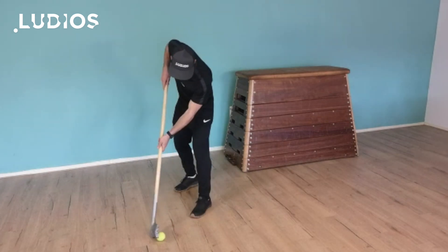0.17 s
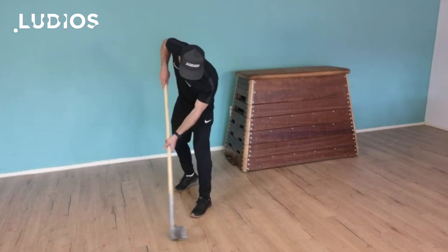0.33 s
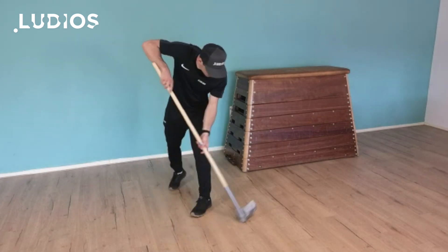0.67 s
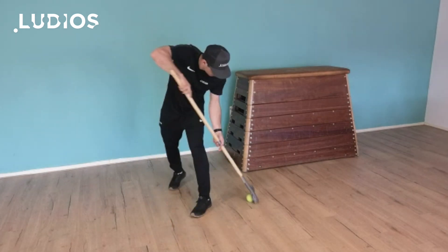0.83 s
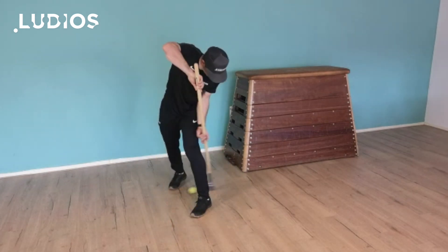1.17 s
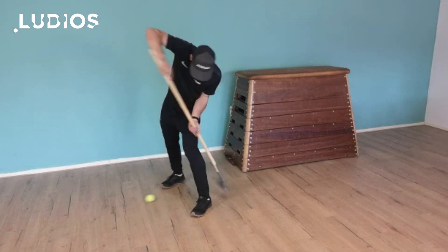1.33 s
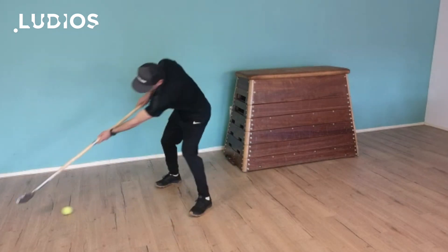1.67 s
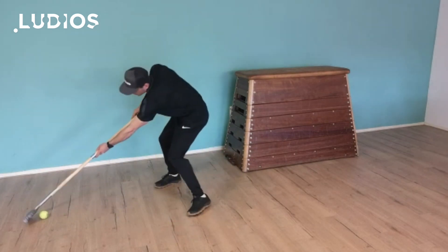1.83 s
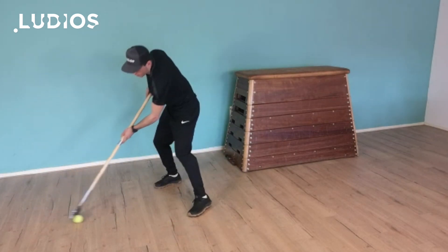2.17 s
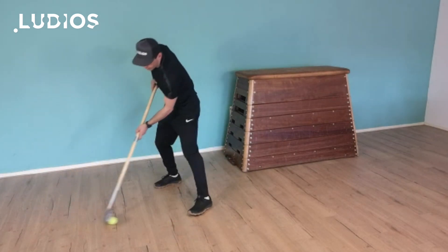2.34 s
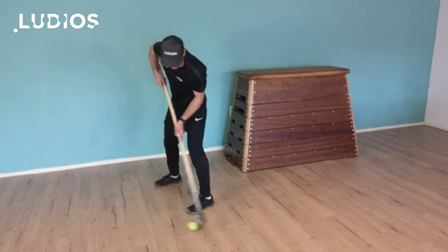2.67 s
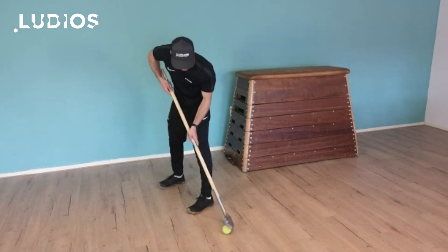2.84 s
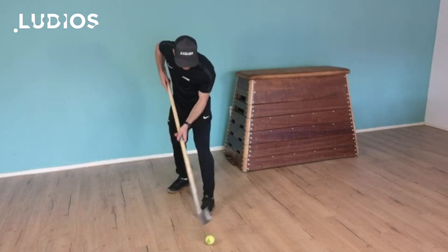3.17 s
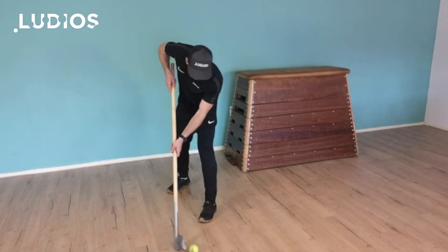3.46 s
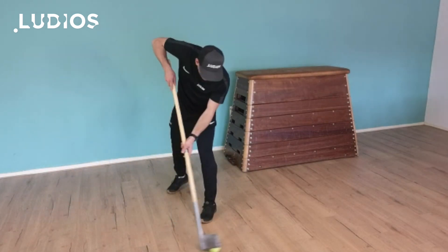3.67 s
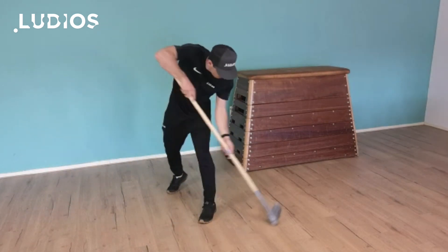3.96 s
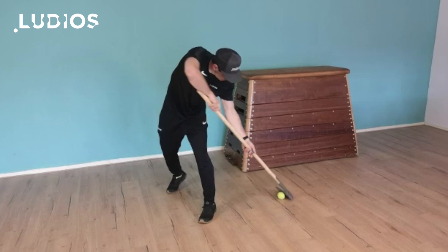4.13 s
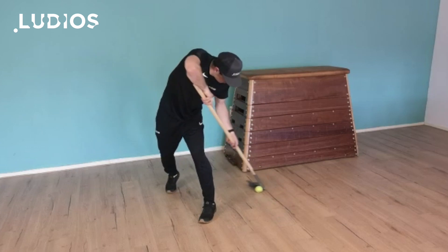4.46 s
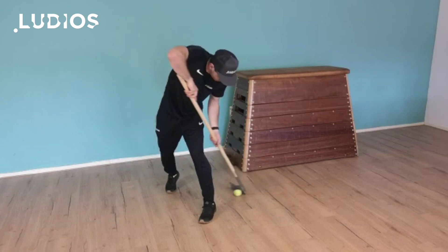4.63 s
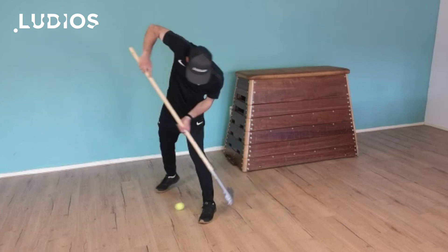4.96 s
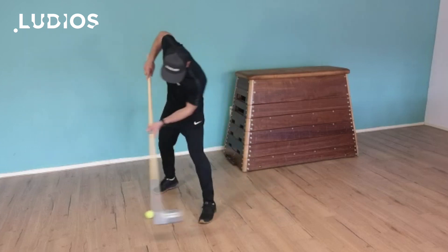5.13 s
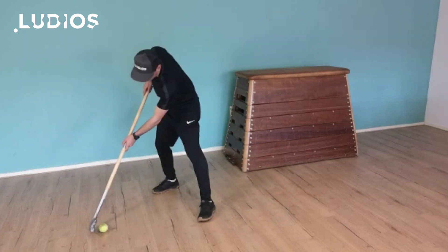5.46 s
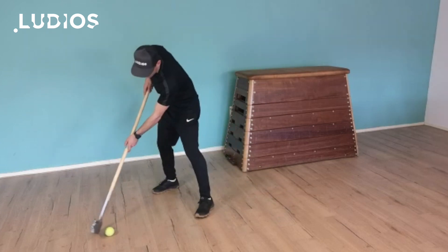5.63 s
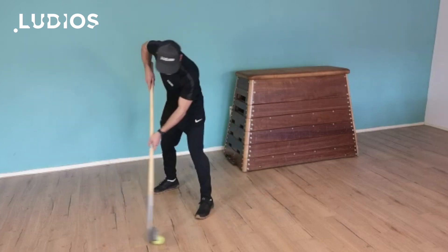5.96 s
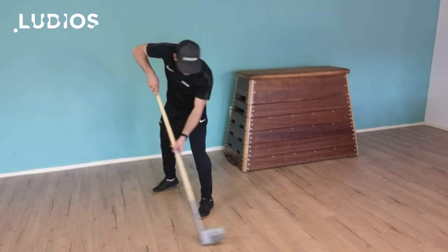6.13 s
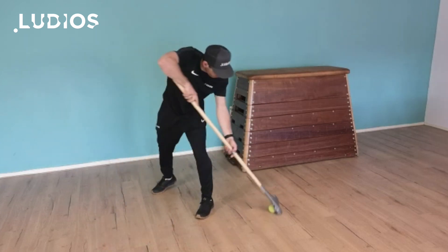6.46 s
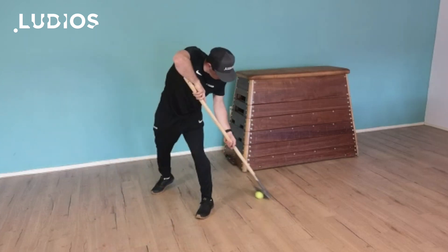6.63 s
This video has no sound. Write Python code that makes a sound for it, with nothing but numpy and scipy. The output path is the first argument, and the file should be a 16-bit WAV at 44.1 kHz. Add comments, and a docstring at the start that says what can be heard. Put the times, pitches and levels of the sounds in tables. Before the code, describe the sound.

A wooden stick dribbles a ball over floorboards in a bare room with a short echo. Gritty, hissing blade scrapes start at once, peaking around 0.5 seconds with a soft floor thump. More strokes and dull ball drags follow from 0.9 to 1.5 seconds, some chattering into rough, gliding squeaks. At 1.8 seconds comes the loudest hit, a quick cluster of clacks and thuds that shakes the boards, followed by squeaky scraping. From 2.3 to 3.7 seconds there are only light taps and faint scuffs. A busy run of scrapes lasts from 3.8 to 4.8 seconds, with a crunchy knock at 4.2 and a hollow, rising ring just after. The ball thuds at 5 and 5.4 seconds, then is dragged softly. A bright scrape with a falling squeak comes at 6.2 seconds, then a small last scuff. Low rumble and faint hiss lie underneath throughout.

```python
"""A bare room with a board floor, where a player dribbles a ball with a wooden stick.
The blade scrapes over grit in strokes and sometimes chatters into a gliding note.
The ball is tapped and dragged, at times with a hollow, rising ring; the blade drops on the floor.
The boards shake under the load and hard walls blur stick and ball.
A low rumble and a faint hiss lie underneath."""
import sys
import numpy as np
from scipy import signal
from scipy.fft import rfft, irfft
from scipy.io import wavfile
from scipy.ndimage import uniform_filter1d, map_coordinates

SR = 44100
rng = np.random.default_rng(int(sys.argv[2]) if len(sys.argv) > 2 else 0)


def wrap_up_sound(samples):
    """Save the sound to the file named by the first command line argument, as 16-bit audio."""
    columns = np.atleast_2d(samples).T
    # keep every value between -1 and 1, then stretch to whole-number steps
    tamed = np.clip(columns, -1, 1)
    steps = np.round(tamed * 32767).astype(np.int16)
    wavfile.write(sys.argv[1], SR, steps)


N = 299785


def from_db(db):
    """Decibels to gain."""
    return 10 ** (np.asarray(db) / 20)


def unit_rms(x):
    """Scale to rms 1."""
    return x / np.sqrt(np.mean(x ** 2) + 1e-20)


def unit_energy(x):
    """Scale a response so that white noise keeps its power through it."""
    return x / np.sqrt(np.sum(x ** 2, axis=-1, keepdims=True) + 1e-20)


def at_hz(points, hz):
    """Read a table on a log-frequency axis."""
    known, values = np.transpose(points)
    return np.interp(np.log(np.maximum(hz, 1)), np.log(known), values)


def wander(steps):
    """Random modulator that glides to a new value each time steps rises by one."""
    return np.interp(steps, np.arange(N), rng.standard_normal(N))


def through(x, response):
    """Pass a sound through an impulse response."""
    return signal.oaconvolve(x, response)[:N]


def body(spectrum, resonances=(), size=8192):
    """Minimum-phase response: a broad EQ curve with narrow resonances on top."""
    hz = np.linspace(0, SR / 2, size // 2 + 1)
    peaks_db = sum(lift / (1 + (2 * (hz - centre) / width) ** 2) for centre, width, lift in resonances)
    cepstrum = irfft(np.log(from_db(at_hz(spectrum, hz) + peaks_db)))
    return unit_energy(irfft(np.exp(rfft(2 * cepstrum[:size // 2], size))))


def pushes(starts, lengths, attacks_s, swells_db, levels_db, arch_db, release_t60_s):
    """Envelope of pushes: each bites, arches with its speed and dies away as the contact lifts."""
    power = np.zeros(N)
    cues = np.broadcast(starts, lengths, attacks_s, swells_db, levels_db)
    for start, length, attack_s, swell_db, level_db in cues:
        first = max(int(start * SR), 0)
        t = np.arange(min(SR, N - first)) / SR
        progress = np.minimum(t / length, 1)
        attack = np.minimum(t / attack_s, 1)
        hold_db = level_db + swell_db * (progress - .5) - arch_db * (2 * progress - 1) ** 2
        release_db = -60 * np.maximum(t - length, 0) / release_t60_s
        power[first:first + len(t)] += (attack * from_db(hold_db + release_db)) ** 2
    return np.sqrt(power)


def friction(slips_per_s, size_db, judder_db, judder_hz, steady_s=0.026):
    """Tiny uneven slips, bunched by the judder of the contact; the hand steadies the mean pressure."""
    slips = (rng.random(N) < slips_per_s / SR) * rng.choice([-1, 1], N)
    sizes = from_db(size_db * np.minimum(rng.exponential(1, N), 4))
    judder = from_db(judder_db * unit_rms(wander(np.arange(N) / SR * judder_hz)))
    mean_pressure = np.sqrt(uniform_filter1d(judder ** 2, int(steady_s * SR)))
    return unit_rms(slips * sizes * judder / mean_pressure)


# Woody resonances of the stick: (frequency [Hz], width [Hz], boost [dB])
STICK_RESONANCES = [(546, 160, 6.5), (863, 38, 1.5), (1496, 25, 2), (1665, 82, 3.5), (2435, 115, 2.5),
                    (2590, 130, 2), (2803, 340, 3), (5550, 560, 2), (7080, 800, 4.5), (7720, 900, 7)]
# Bright EQ of the blade's edge: (frequency [Hz], level [dB])
HISS_EQ = [(100, -32), (500, -26), (1500, -17), (3000, -1), (4000, 2), (5200, 5), (7800, -2), (9200, -1),
           (10500, -10.5), (15000, -18)]
# Midrange EQ of the whole blade: (frequency [Hz], level [dB])
RASP_EQ = [(200, -50), (1000, -3.5), (1500, 2), (2100, 6), (2700, 2), (3300, -3), (5000, -3.5),
           (8000, -16.5), (12000, -37)]
# Blade strokes: (start [s], length [s], attack [s], swell [dB], hiss level [dB], rasp level [dB])
BLADE_STROKES = [(0.0, 0.72, 0.0012, 2, -62.5, -75), (0.151, 0.26, 0.0083, 29.5, -50, -56),
                 (0.41, 0.11, 0.014, -1, -42, -60), (0.488, 0.11, 0.015, 0.5, -36.5, -47.5),
                 (0.864, 0.12, 0.035, 2.5, -46.5, -54.5), (0.97, 0.059, 0.017, 1, -44.5, -50.5),
                 (1.155, 0.069, 0.02, -1.5, -50.5, -49.5), (1.237, 0.26, 0.12, -13.5, -59.5, -48.5),
                 (1.558, 0.24, 0.018, 0, -75, -69), (1.768, 0.12, 0.01, -15.5, -53, -46.5),
                 (1.929, 0.18, 0.0082, 0.5, -48.5, -50), (2.108, 0.079, 0.016, 7.5, -46.5, -50),
                 (2.535, 0.065, 0.029, -3, -55.5, -54), (2.936, 0.036, 0.0069, -1, -65, -52.5),
                 (3.229, 0.019, 0.002, -3, -71, -59.5), (3.455, 0.09, 0.032, 1, -60, -63.5),
                 (3.583, 0.23, 0.027, 7, -65, -68), (3.825, 0.041, 0.004, 1, -41, -49),
                 (3.859, 0.14, 0.038, -24, -38.5, -50.5), (4.093, 0.13, 0.033, 3.5, -40, -51),
                 (4.237, 0.33, 0.034, -11, -54, -50), (4.508, 0.11, 0.015, 7.5, -43, -40.5),
                 (4.626, 0.081, 0.016, 11.5, -43.5, -45.5), (4.738, 0.028, 0.007, -16, -43.5, -49),
                 (4.862, 0.077, 0.043, -25, -66, -60), (5.392, 0.047, 0.024, -3, -49, -67),
                 (5.472, 0.15, 0.024, -18, -67.5, -59.5), (5.621, .16, 0.0051, 9, -55, -58.5),
                 (5.832, 0.27, 0.037, -18, -70.5, -78), (6.18, 0.16, 0.015, -3.5, -38.5, -51),
                 (6.491, 0.055, 0.033, -6, -52.5, -58.5)]


def blade_scrape():
    """The edge hisses over the grit; pressed down, the whole blade rasps."""
    *shape, hiss_db, rasp_db = np.transpose(BLADE_STROKES)
    edge, pressure = (pushes(*shape, db, arch_db=4, release_t60_s=0.04) for db in (hiss_db, rasp_db))
    hiss = edge * friction(slips_per_s=18000, size_db=-1.0, judder_db=3.5, judder_hz=150)
    rasp = pressure * friction(slips_per_s=7000, size_db=2.0, judder_db=6.0, judder_hz=130)
    return through(hiss, body(HISS_EQ, STICK_RESONANCES)) + through(rasp, body(RASP_EQ, STICK_RESONANCES))


# Dull EQ of the rubbing ball: (frequency [Hz], level [dB])
RUB_EQ = [(80, -16.5), (250, -6), (400, -5), (550, -7), (900, -1), (1400, -3), (2500, -9), (8000, -44)]
# Drags of the ball: (start [s], length [s], swell [dB], level [dB])
BALL_DRAGS = [(0.0, 0.34, -9, -78), (0.358, 0.22, 10, -62), (0.94, 0.072, 25.5, -65),
              (1.148, 0.049, 6, -52), (1.298, 0.23, -10, -60.5), (1.833, 0.072, -1, -58.5),
              (1.945, 0.11, -12, -64), (2.149, 0.035, -7, -61.5), (2.946, 0.13, -16, -68.5),
              (4.132, 0.36, -5.5, -53), (4.536, 0.19, -7.5, -53), (4.866, 0.12, -22, -74),
              (5.389, 0.077, -4, -52), (5.481, 0.34, -6, -69)]


def ball_drag(attack_s=0.0058):
    """The ball rubs between blade and boards with a duller grain."""
    starts, lengths, swells_db, levels_db = np.transpose(BALL_DRAGS)
    envelope = pushes(starts, lengths, attack_s, swells_db, levels_db, arch_db=2.0, release_t60_s=0.14)
    grain = friction(slips_per_s=3100, size_db=2.5, judder_db=3.5, judder_hz=100)
    return through(envelope * grain, body(RUB_EQ, STICK_RESONANCES))


# Low end of the room tone: (frequency [Hz], level [dB])
RUMBLE_EQ = [(20, 2), (45, 0.5), (62, -13.5), (85, -9.5), (120, -16.5), (200, -26), (320, -34.5),
             (600, -73)]
# Airy top of the room tone: (frequency [Hz], level [dB])
AIR_EQ = [(400, -2.5), (800, -7), (2000, 0.5), (3300, -6.5), (5500, -8.5), (7800, -9), (10500, -18.5),
          (15000, -20.5)]


def room_tone(rumble_db=-51, air_db=-71, side_db=-30):
    """A steady bed of near-mono rumble and faint, wide hiss."""
    mid, side = (through(rng.standard_normal(N), body(RUMBLE_EQ)) for _ in range(2))
    rumble = mid + from_db(side_db) * side * [[1], [-1]]
    air = np.array([through(rng.standard_normal(N), body(AIR_EQ)) for _ in range(2)])
    return from_db(rumble_db) * rumble + from_db(air_db) * air


# Rough gliding notes, the blade's chatter and the dragged ball's hollow, rising ring:
# (start [s], length [s], level [dB], first pitch [Hz], last pitch [Hz], held in step [cycles])
GLIDING_NOTES = [(0.233, 0.22, -54.5, 3260, 3708, 2.78), (0.994, 0.045, -45.5, 5770, 5500, 3.1),
                 (1.319, 0.16, -53, 2164, 1759, 2.6), (1.931, 0.18, -54, 2928, 2558, 3.85),
                 (2.11, 0.075, -47, 2702, 3356, 3), (2.555, 0.0442, -61, 2300, 2050, 4.8),
                 (2.947, 0.035, -58.5, 2498, 2250, 3.5), (3.224, .03, -65, 2630, 2590, 3),
                 (3.83, 0.027, -47, 2753, 2800, 3.1), (3.882, 0.064, -43, 3650, 3200, 2.3),
                 (4.33, 0.18, -52.5, 955.4, 1250, 1.6), (4.523, 0.0393, -47.5, 2257, 2050, 4.5),
                 (4.575, 0.141, -46.5, 1557, 1590, 3.1), (5.629, 0.16, -65.5, 2540, 2896, 5.1),
                 (6.19, 0.12, -40.5, 3013, 2447, 4), (6.509, 0.035, -58.5, 2600, 2560, 6)]


def chatter_and_ring(attack_s=0.0077, swell_db=-9.5):
    """Slips lock loosely to a gliding resonance; the sooner they lose step, the rougher the note."""
    starts, lengths, levels_db, first_hz, last_hz, cycles_held = np.transpose(GLIDING_NOTES)
    t = np.arange(N) / SR
    note = np.maximum(np.searchsorted(starts, t) - 1, 0)
    glide = np.clip((t - starts[note]) / lengths[note], 0, 1)
    hz = first_hz[note] + (last_hz - first_hz)[note] * glide
    envelope = pushes(starts, lengths, attack_s, swell_db, levels_db, arch_db=1.5, release_t60_s=0.079)
    phase = 2 * np.pi * np.cumsum(hz) / SR
    lapses = np.cumsum(hz / cycles_held[note]) / SR
    tone = unit_rms(wander(lapses) * np.cos(phase) + wander(lapses) * np.sin(phase))
    flat_eq = [(1, 0), (SR, 0)]
    return through(envelope * tone, body(flat_eq, STICK_RESONANCES))


def ringing(modes):
    """Response of a struck object: dying sines of alternating polarity."""
    t = np.arange(SR) / SR
    return unit_energy(sum((-1) ** k * from_db(db - 60 * t / t60) * np.sin(2 * np.pi * hz * t)
                           for k, (hz, db, t60) in enumerate(modes)))


# Boom of the floorboards: (frequency [Hz], level [dB], t60 [s])
BOOM_MODES = [(62, -7, 0.63), (85.7, 7.5, 0.19), (114.6, 4.5, 0.19), (168, 3, 0.13)]
# Thud of the ball contact: (frequency [Hz], level [dB], t60 [s])
BALL_MODES = [(221.5, -0.5, 0.09), (240.2, -0.5, 0.15), (288.4, 4.5, 0.037), (376, -2, 0.058),
              (515, 1, 0.013), (935, -9, 0.031)]
# EQ of a hit on the stick: (frequency [Hz], level [dB])
CLACK_EQ = [(150, -12.5), (700, -2.5), (1300, 1.5), (2300, -4), (3300, -12), (5000, -14), (8000, -25.5),
            (12000, -29.5)]
# Hits of blade and ball: (time [s], boom [dB], thud [dB], clack [dB], crunch [dB])
HITS = [(0.564, -42.5, -52, -71, -65), (1.171, -56, -49.5, -67, -60), (1.7723, -52, -38, -39, -36.5),
        (1.7875, -35, -37, -32.5, -42.5), (1.811, -29.5, -53, -57, -60), (1.83, -34.5, -41.5, -54, -47),
        (2.035, -37, -45.5, -55, -58), (2.832, -44.5, -52, -56, -53), (2.929, -60, -47, -66, -59),
        (3.537, -67, -52, -54.5, -52), (4.159, -50, -43.5, -55, -38), (4.708, -40, -44.5, -56, -52),
        (5.01, -48, -37, -55, -52.5), (5.399, -35.5, -38, -45.5, -46.5), (5.436, -40, -53, -60, -60),
        (5.779, -56, -50, -58, -57)]


def knocks(crunch_t60_s=0.06, level_window_s=0.005):
    """Each hit booms and thuds; a square one clacks in the stick, a glancing one crunches over grit."""
    times, *levels_db = np.transpose(HITS)
    impulses = np.zeros((4, N))
    impulses[:, np.round(times * SR).astype(int)] = from_db(levels_db) * np.sqrt(level_window_s * SR)
    boom, thud, clack, glance = impulses
    t = np.arange(SR // 10) / SR
    crunch_decay = unit_energy(from_db(-60 * t / crunch_t60_s))
    crunch_envelope = np.sqrt(np.abs(through(glance ** 2, crunch_decay ** 2)))
    crunch = crunch_envelope * rng.standard_normal(N)
    stick = through(clack + crunch, body(CLACK_EQ, STICK_RESONANCES))
    return through(boom, ringing(BOOM_MODES)) + through(thud, ringing(BALL_MODES)) + stick


# Sub-heavy EQ of the shaking boards: (frequency [Hz], level [dB])
BOARD_EQ = [(20, -17), (36, -1), (47, 10), (62, -9.5), (87, -5), (125, -14), (200, -23.5), (400, -52)]
# Loads from the rolling ball and shifting weight: (start [s], length [s], level [dB])
BOARD_LOADS = [(1.752, 0.1, -42), (2.624, 0.4, -54), (3.303, 0.6, -59), (4.17, 0.26, -51.5),
               (4.545, 0.17, -53.5), (5.412, 0.12, -45.5), (6.221, 0.19, -56.5)]


def board_rumble():
    """The floor rumbles under load; its long waves reach both microphones alike."""
    starts, lengths, levels_db = np.transpose(BOARD_LOADS)
    load = pushes(starts, lengths, attacks_s=0.046, swells_db=0, levels_db=levels_db,
                  arch_db=2.5, release_t60_s=0.18)
    return through(load * rng.standard_normal(N), body(BOARD_EQ))


# Reverb time of the bare room: (frequency [Hz], t60 [s])
REVERB_DECAY = [(100, 0.5), (300, 0.3), (1000, 0.28), (6000, 0.32), (14000, 0.29)]


def reflections(echoes=6, echo_db=-11, build_s=0.00062, side_cut_hz=300):
    """Stereo reverb of one spot: a few wall echoes and a diffuse tail that dies band by band."""
    t = np.arange(SR) / SR
    hz = np.arange(SR // 2 + 1)
    noise_spectra = rfft(rng.standard_normal((2, SR)))
    build = 1 - np.exp(-t / build_s)
    response = np.zeros((2, SR))
    edges_hz = np.geomspace(40, SR / 2, 15)
    for low, high in zip(edges_hz, edges_hz[1:]):
        band = irfft(noise_spectra * ((hz >= low) & (hz < high)), SR)
        decay = from_db(-60 * t / at_hz(REVERB_DECAY, np.sqrt(low * high)))
        response += unit_energy(band * build * decay) * np.sqrt((high - low) / SR)
    for part in response:
        arrivals = (rng.uniform(.002, .022, echoes) * SR).astype(int)
        part[arrivals] += from_db(echo_db) * unit_energy(rng.standard_normal(echoes))
    mid, side = response
    # long waves reach both microphones alike
    side = signal.sosfilt(signal.butter(3, side_cut_hz, "high", fs=SR, output="sos"), side)
    return mid + side * [[1], [-1]]


# The play swings from side to side: (time [s], lead of the left side [ms], left minus right [dB])
PAN_PATH = [(1, -0.03, -0.4), (1.35, 0.057, 0), (1.8, 0.23, -0.4), (3.1, 0.01, 0), (3.9, -0.052, -0.5),
            (4.3, -0.13, 0.3), (5.5, 0.18, 0.4), (6.3, -0.059, -1)]


def room(send, direct, spots=6, spots_per_s=36):
    """Direct sound reaches the nearer microphone first; the moving source crossfades between reverbs."""
    samples = np.arange(N)
    times, *columns = np.transpose(PAN_PATH)
    lead_ms, balance_db = (np.interp(samples / SR, times, column) for column in columns)
    lead = lead_ms * SR / 1000
    stereo = np.array([map_coordinates(direct, [samples + sign * lead / 2], order=3) for sign in (1, -1)])
    position = samples / SR * spots_per_s
    for spot in range(spots):
        distance = np.abs((position - spot + spots / 2) % spots - spots / 2)   # the spots form a loop
        here = send * np.cos(np.pi / 2 * np.minimum(distance, 1))
        stereo += np.array([through(here, channel) for channel in reflections()])
    return stereo * from_db(balance_db / 2 * [[1], [-1]])


def scene(scrape_direct_db=-7.0, knock_direct_db=-5.5):
    """Stick and ball play in the room, over the rumble of the boards and the room tone."""
    scrapes = blade_scrape() + chatter_and_ring() + ball_drag()
    hits = knocks()
    direct = from_db(scrape_direct_db) * scrapes + from_db(knock_direct_db) * hits
    return room(scrapes + hits, direct) + board_rumble() + room_tone()


def record(dry):
    """A steep low-pass takes the very top off the mix."""
    cutoff_hz = 15400
    return signal.sosfilt(signal.ellip(10, .1, 70, cutoff_hz, fs=SR, output="sos"), dry)


dry = scene()
out = record(dry)
wrap_up_sound(out)
```